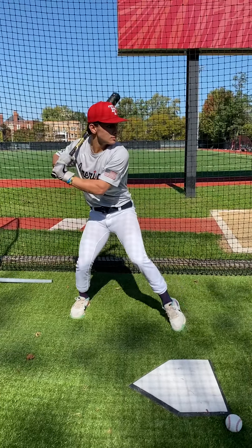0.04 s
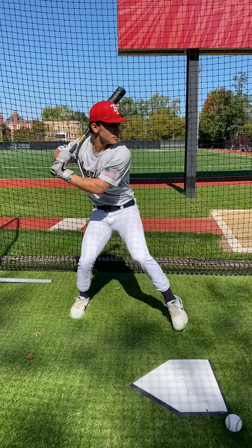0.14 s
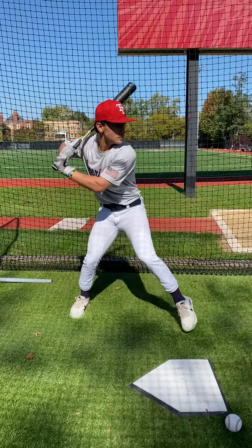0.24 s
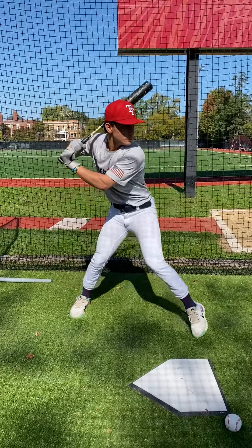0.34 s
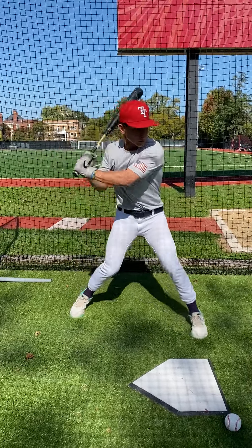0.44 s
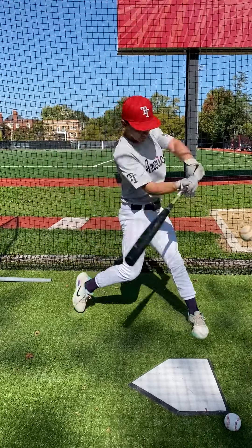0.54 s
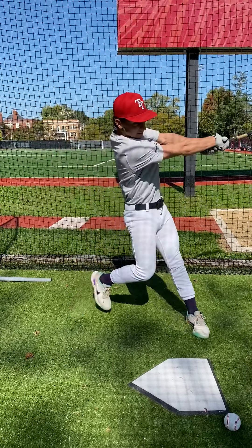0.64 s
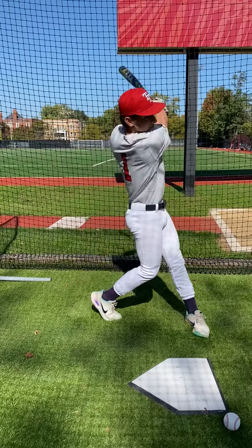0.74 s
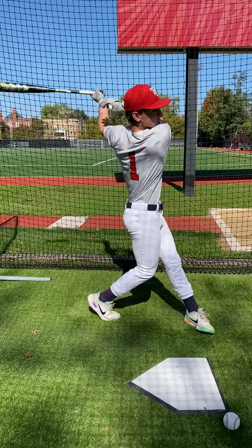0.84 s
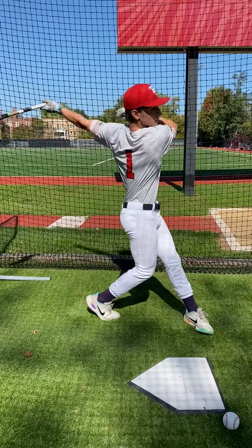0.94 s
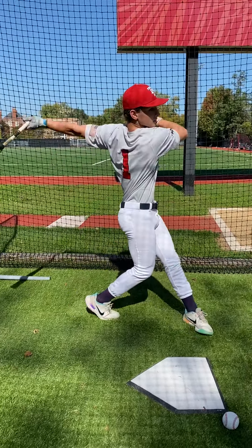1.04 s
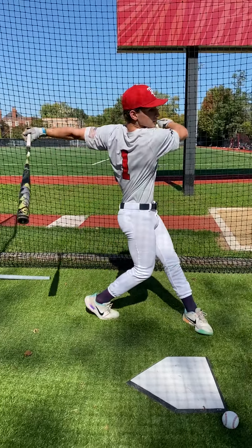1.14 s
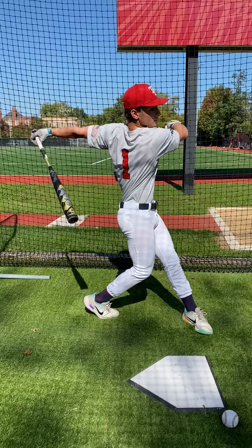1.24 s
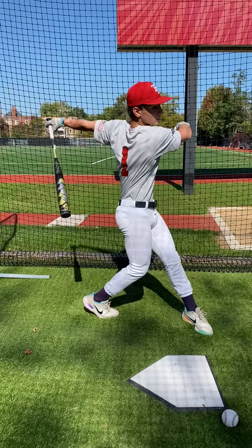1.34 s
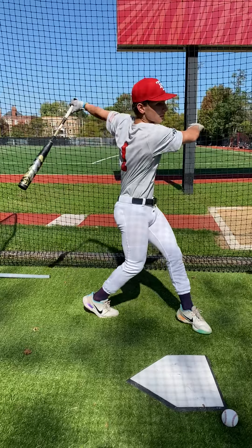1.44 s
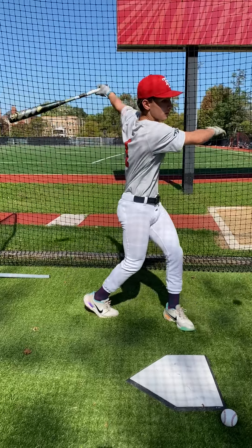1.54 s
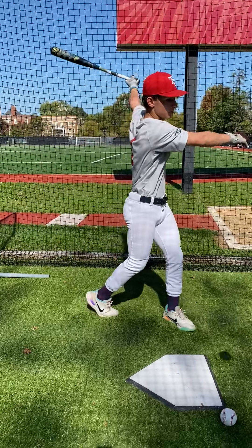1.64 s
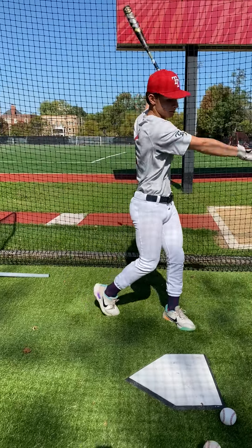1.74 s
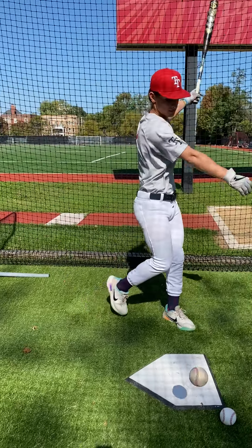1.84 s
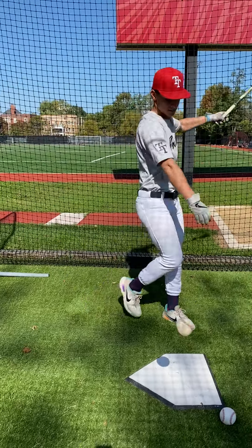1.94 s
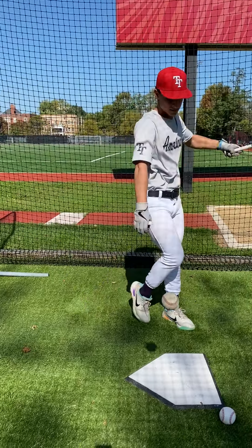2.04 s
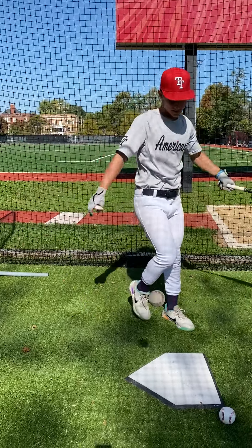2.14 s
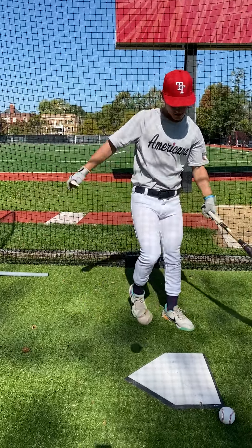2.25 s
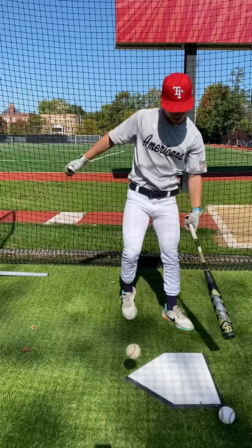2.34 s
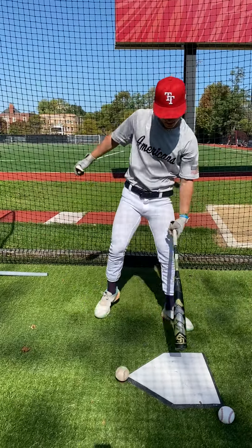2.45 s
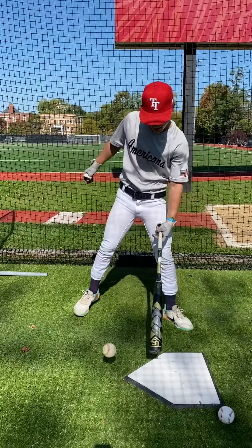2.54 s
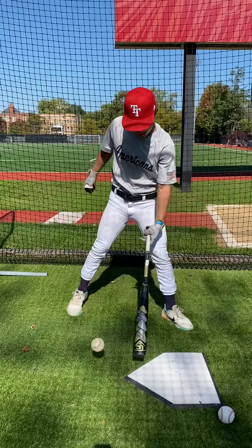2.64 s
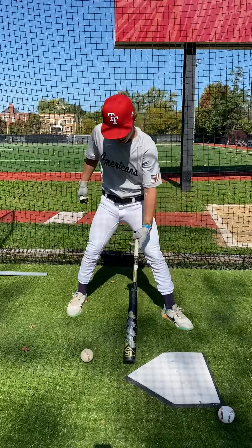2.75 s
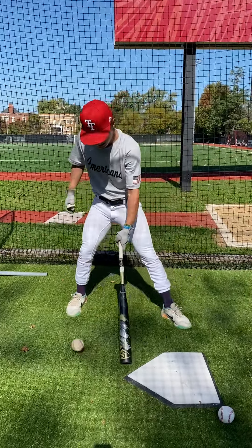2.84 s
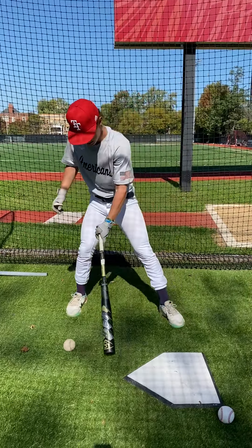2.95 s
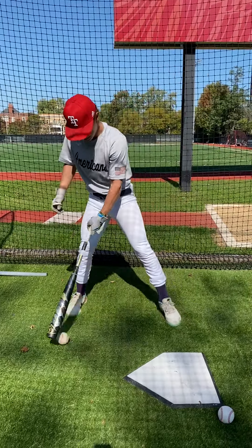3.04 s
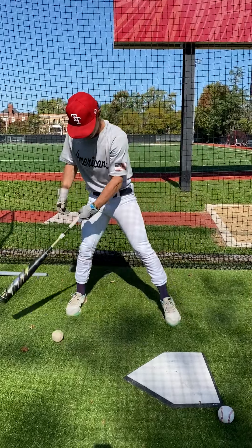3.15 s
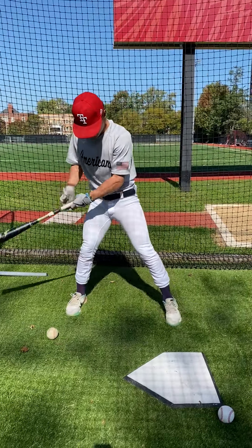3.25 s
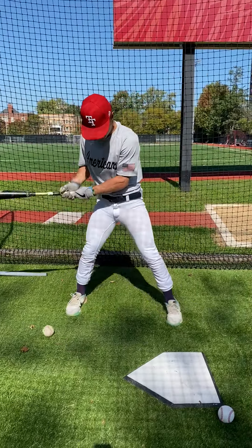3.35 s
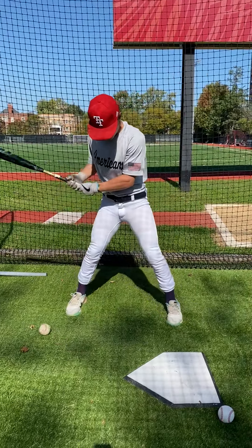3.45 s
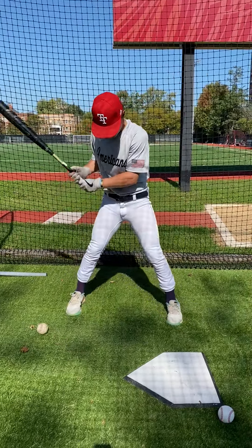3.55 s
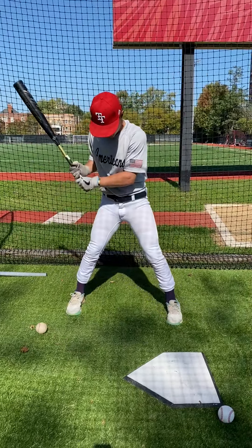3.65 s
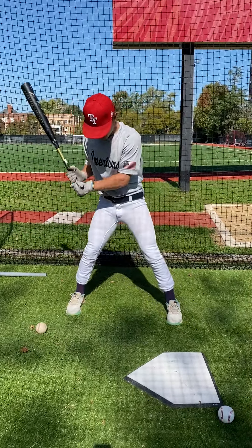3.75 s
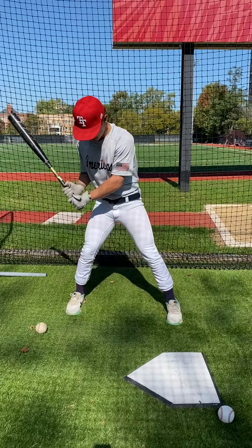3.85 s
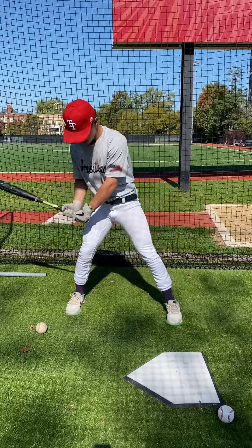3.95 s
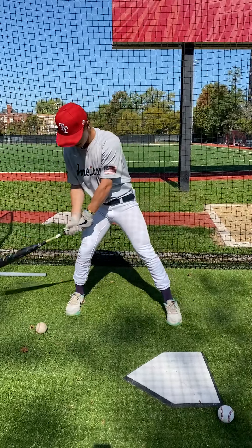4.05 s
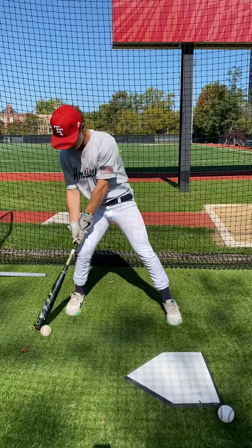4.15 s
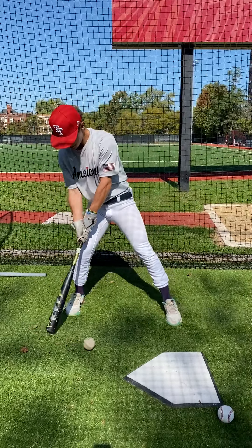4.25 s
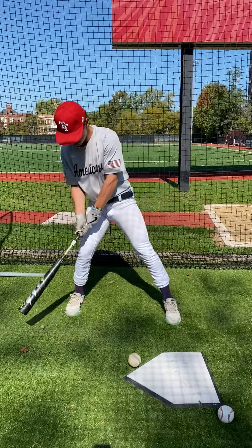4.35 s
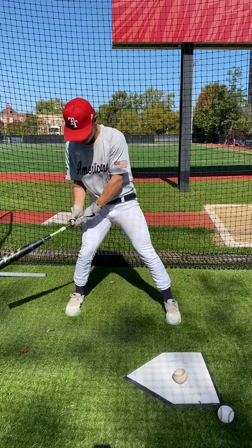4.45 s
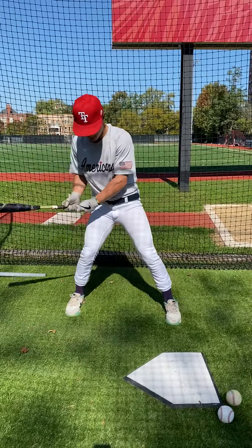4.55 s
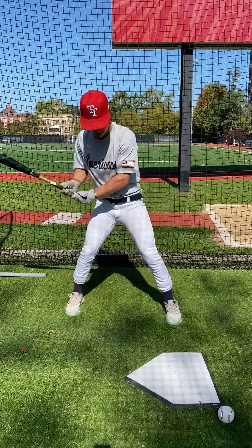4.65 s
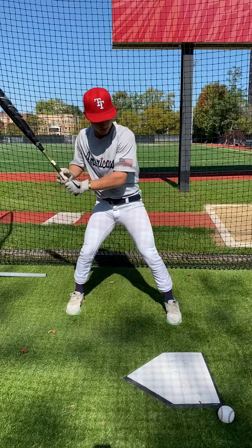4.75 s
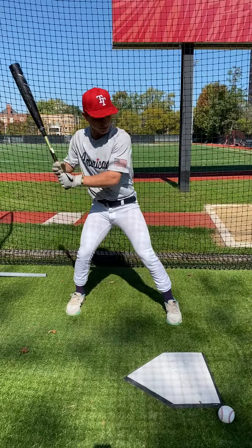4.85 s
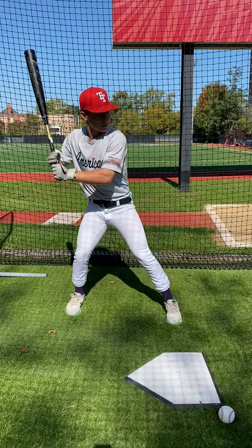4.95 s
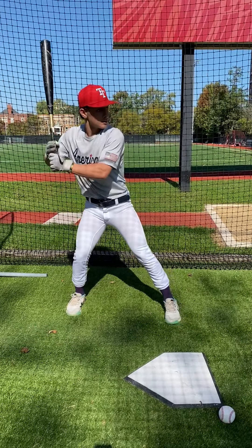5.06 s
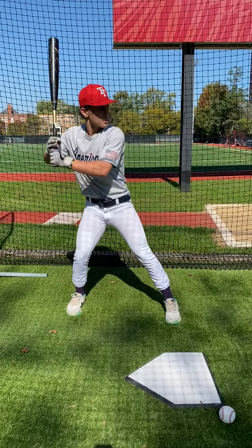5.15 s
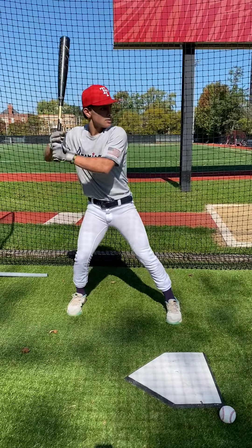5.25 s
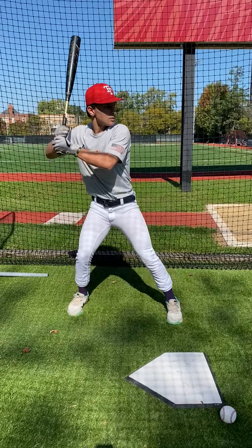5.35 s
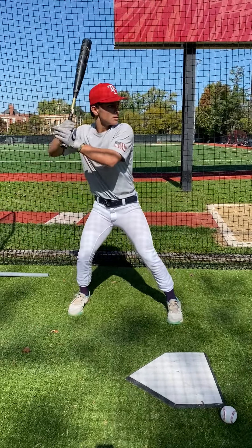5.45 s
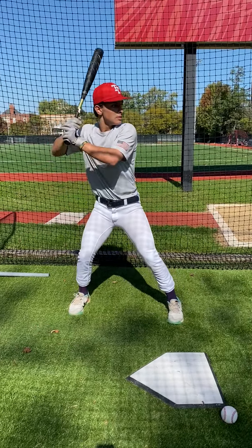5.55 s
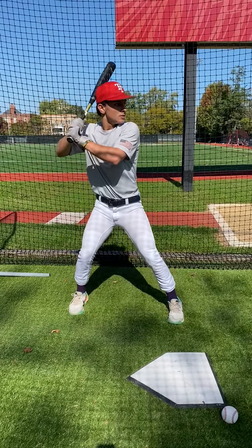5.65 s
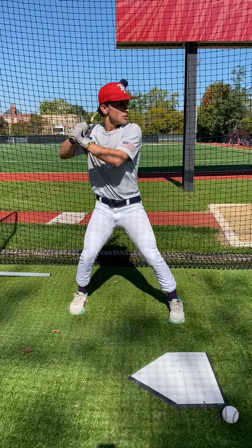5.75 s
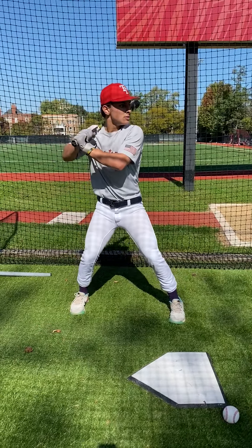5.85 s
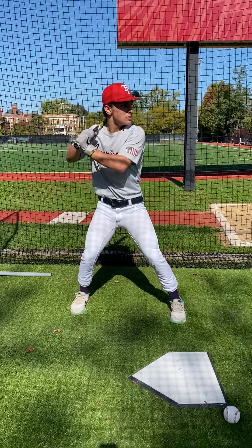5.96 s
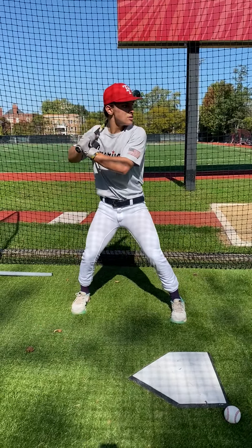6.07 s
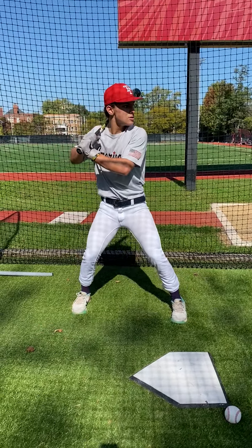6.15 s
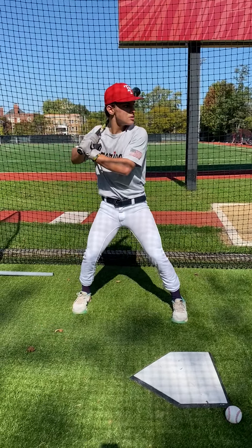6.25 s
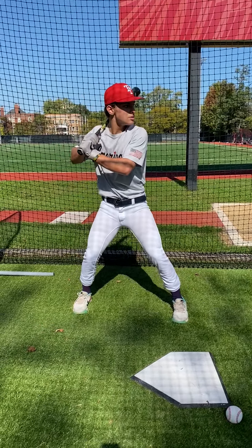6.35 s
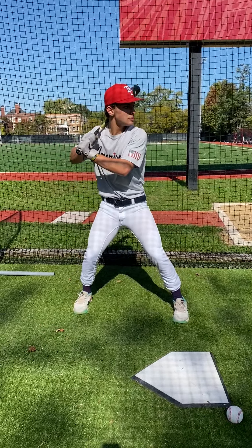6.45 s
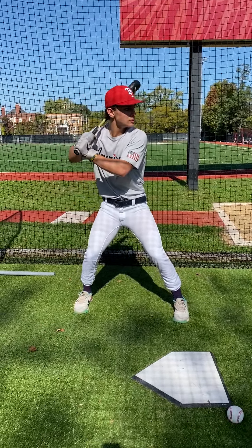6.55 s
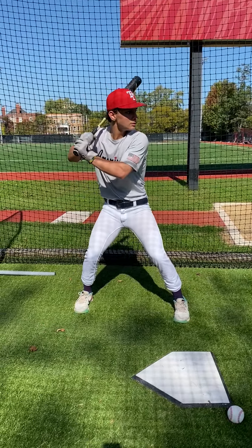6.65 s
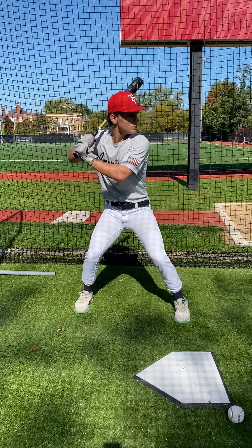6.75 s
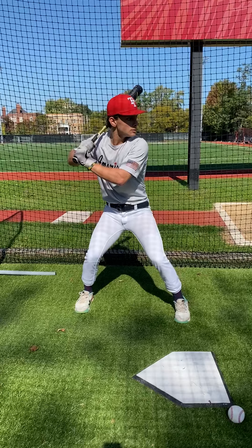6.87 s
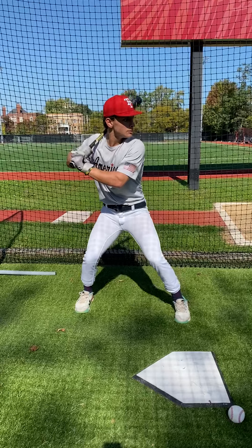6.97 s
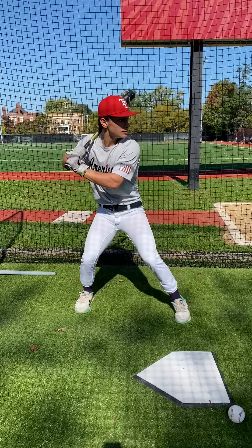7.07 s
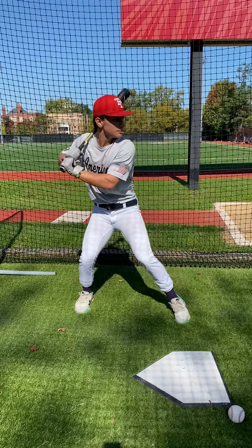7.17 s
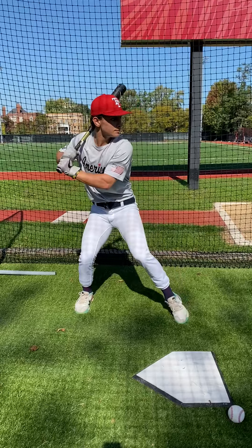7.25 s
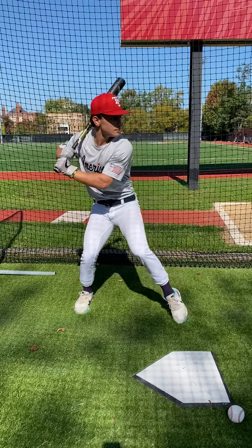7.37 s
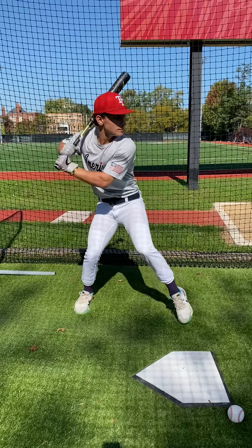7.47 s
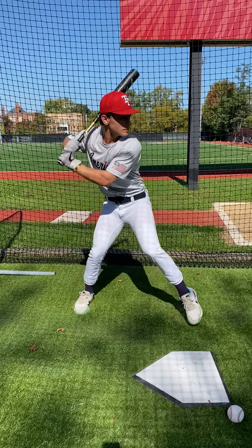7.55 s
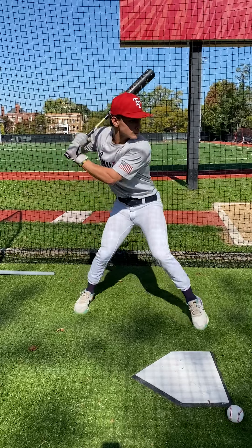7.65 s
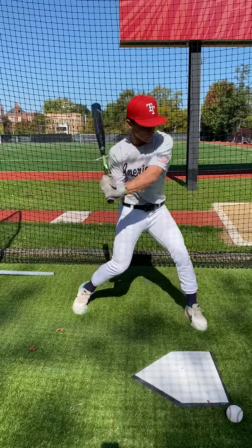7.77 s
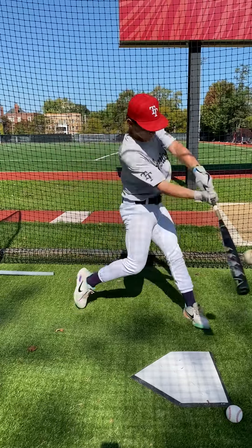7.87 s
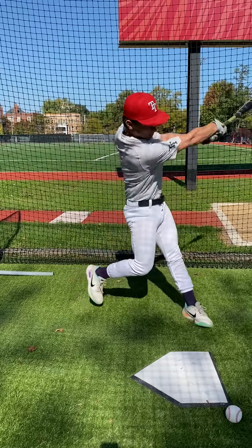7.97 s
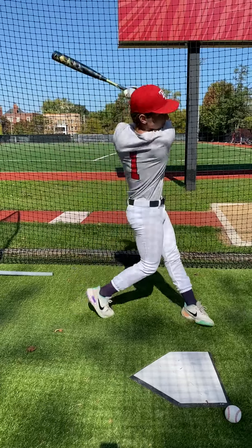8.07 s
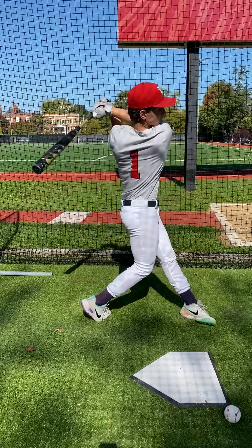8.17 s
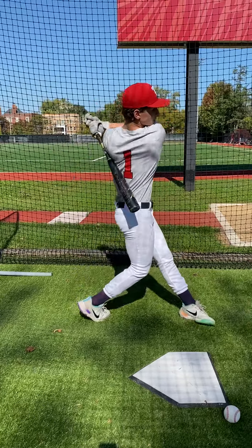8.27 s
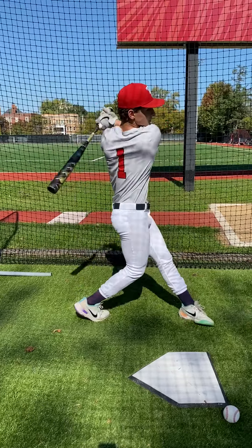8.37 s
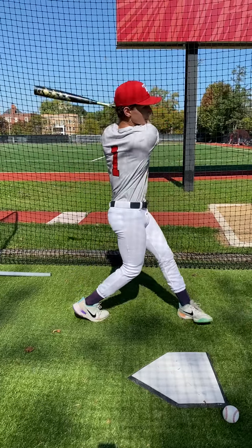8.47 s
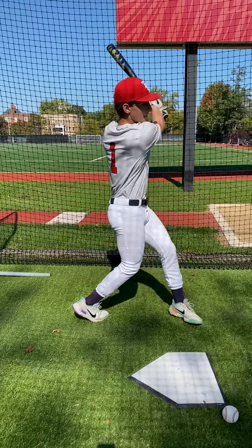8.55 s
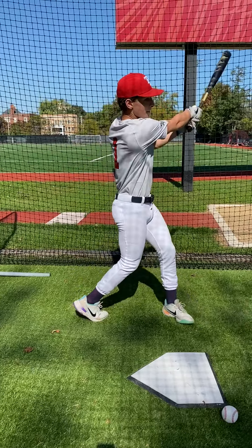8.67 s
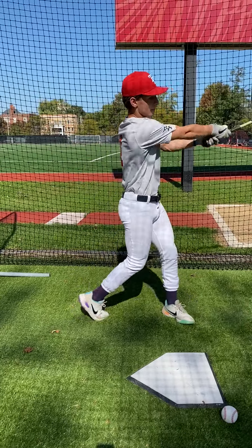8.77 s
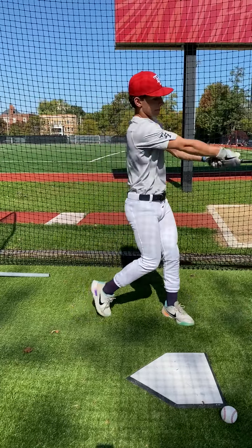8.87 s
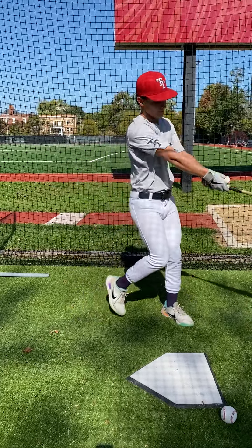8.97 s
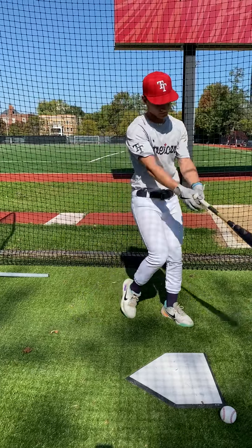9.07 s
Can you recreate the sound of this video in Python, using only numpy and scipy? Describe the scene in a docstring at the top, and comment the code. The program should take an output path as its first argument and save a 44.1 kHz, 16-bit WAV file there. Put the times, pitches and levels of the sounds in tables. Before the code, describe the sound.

Two sharp metallic bat cracks over a low outdoor hum, the first followed by a loud ringing clang, the second by a light net rattle.

```python
"""An outdoor batting cage: two swings over a low hum and distant rumble.
The bat cracks from broadband pulses, noise bursts and the decaying modes of its barrel.
The first ball clangs on the steel frame, the second slaps the net and grazes the frame: clatter and modes.
Thuds on turf are soft pulses; clothes, scuffs and swishes are swells of coloured noise.
Field, stands and near fence answer as scattered noise tails; gain control ducks after each loud blow."""
import sys
import numpy as np
from scipy import signal
from scipy.fft import rfft, irfft, next_fast_len
from scipy.io import wavfile
from scipy.ndimage import uniform_filter1d, minimum_filter1d

SR = 44100
rng = np.random.default_rng(int(sys.argv[2]) if len(sys.argv) > 2 else 0)


def bounce(signal):
    """Save signal as a 16-bit WAV file at the path given by the first command-line argument."""
    frames = np.transpose(np.atleast_2d(signal))
    limited = np.clip(frames, -1, 1)
    pcm = np.round(limited * 32767).astype(np.int16)
    wavfile.write(sys.argv[1], SR, pcm)


N = 401751
TIME = np.arange(N) / SR

# bat on ball: (time [s], crack base level [dB], lead of first contact [s], contact base level [dB],
# barrel ring base level [dB], ball knock level [dB], knock pitch [Hz], air thump level [dB],
# thump pitch [Hz], left-right balance of the knock [dB], lag of the snap [s], snap level [dB],
# zing level [dB], after-ring level [dB])
HITS = [(0.6321, -4, 0.0075, -20.5, -11.5, -7.5, 1050, -9.5, 150, 3, .0005, -19, -10.5, -19.5),
        (7.9364, -2.5, 0.005, -19.5, -4, -6.5, 900, 3, 80, 5.5, .0027, -9.5, -16.5, -20)]


def bat():
    """Air runs ahead and the barrel's zing swells into the crack; first contact sets the barrel ringing; crack,
    snap, knock and thump follow."""
    # spectra of the crack, the first contact and the bright snap: (frequency [Hz], density [dB per Hz])
    crack_colour = [(40, -21), (170, -3), (350, 1), (500, 5), (660, -8), (900, 1), (1400, -4.5),
                    (2100, -15.5), (3100, -3.5), (4500, -7.5), (6500, -15.5), (8700, -26), (12000, -35),
                    (16000, -39.5)]
    contact_colour = [(100, -14.5), (800, 4), (2000, -9), (3200, -0.5), (5200, -3), (7000, -24),
                      (16000, -40.5)]
    snap_colour = [(500, -24.5), (3000, -5.5), (6500, 1.5), (9000, 0.5), (10500, -7), (13000, -0.5),
                   (16000, -2)]
    # modes of the barrel, then of its after-ring: (frequency [Hz], level [dB], t60 [s])
    barrel_modes = [(490, -5.5, .04), (890, 0.5, .04), (1148, -3.5, 0.05), (1640, -6, 0.045),
                    (2300, -13, 0.05), (2880, -5, .04), (3085, -2.5, 0.06), (4000, -6, .03),
                    (4850, -10.5, 0.04)]
    after_modes = [(3420, -0.5, 0.12), (2560, -13, .09)]
    zing_echo_s, zing_echo_db = .076, -24
    after_sharp_hz = -514  # the after-ring starts flat and slides up as the bat swings round

    def crack_push(cycles):
        """One pressure pulse in the colour of the crack."""
        return push(lambda hz: read(crack_colour, hz), cycles)

    out = np.zeros((2, N))
    for (s, crack_db, lead, contact_db, ring_db, knock_db, knock_hz, thump_db, thump_hz,
         pan_db, snap_lag, snap_db, zing_db, after_db) in HITS:
        # air ahead of the bat
        add(out, s - .03, amp(-24.5) * thump(80, octaves=0.9, cycles=1.1))

        # first contact
        contact = s - lead
        add(out, contact, amp(contact_db) * burst(contact_colour, t60=0.16, apart=0.33))
        contact_push = push(lambda hz: read(contact_colour, hz), cycles=1.3)
        add(out, contact, amp(contact_db - 3.5) * contact_push)
        early_ring = eased(ring(barrel_modes, apart=0.26, waver_hz=70), rise_s=0.013)
        add(out, contact, amp(ring_db + 2.0) * early_ring)

        # zing, peaking at the crack
        swell = amp(zing_db) * zing()
        add(out, s - .03, swell)
        add(out, s - .03 + zing_echo_s, amp(zing_echo_db) * swell)  # off the near fence

        # barrel after the crack
        after_ring = ring(after_modes, apart=.2, waver_hz=70, sharp_hz=after_sharp_hz)
        add(out, s, amp(after_db) * after_ring)
        add(out, s, amp(ring_db + 0.5) * ring(barrel_modes, apart=0.22, waver_hz=65))

        # crack and its brightest edge
        add(out, s, amp(crack_db - 5) * crack_push(cycles=2.1))
        add(out, s + snap_lag, amp(snap_db) * push(lambda hz: read(snap_colour, hz), cycles=.6))
        add(out, s + 0.0041, amp(crack_db - 8.0) * crack_push(cycles=1.2), pan_db)  # off the ground
        add(out, s, amp(crack_db - 4.5) * burst(crack_colour, t60=0.05, apart=0.35))

        # knock of the ball and thump of air
        add(out, s + 0.0012, amp(knock_db) * thump(knock_hz, octaves=0.67, cycles=1.8), pan_db)
        add(out, s + 0.0028, amp(thump_db) * thump(thump_hz, octaves=1.24, cycles=.65))
    return out


def zing():
    """A narrow band of barrel vibration that swells to a point 30 ms in, then dies within milliseconds."""
    # spectrum: (frequency [Hz], density [dB per Hz])
    zing_colour = [(1500, -59.5), (2700, -23.5), (3000, -7), (3400, 0.5), (3600, -3), (3950, -20.5),
                   (7000, -60.5)]
    rise_s, fall_s = 0.0042, 0.0034
    t = TIME[:SR // 12] - .03
    envelope = np.exp(np.minimum(t / rise_s, -t / fall_s))
    return blow(noise(zing_colour, len(t), apart=0.27) * envelope)


def cage():
    """The ball brushes into the net; the fittings clatter, the steel frame rings and the net rattles."""
    # ball into the cage: (time [s], clatter level [dB], clatter t60 [s],
    # brightness [dB per octave], frame ring level [dB], left-right balance [dB])
    cage_hits = [(0.7573, -4, 0.07, 0, -4.5, -2.5), (0.7654, -5.5, 0.115, 1.4, -12, 0),
                 (8.0637, -18, 0.14, -0.5, -29, -1), (8.089, -23.5, 0.15, -1.5, -26.5, -1),
                 (8.105, -29.5, 0.5, 1.5, -46, 0)]
    # the frame sings on after the ball has left, sharp at first when struck hard:
    # (time [s], level [dB], starts sharp by [Hz], level of damped start [dB], level of buzz [dB])
    singing = [(.765, -29, 170, -8.5, -25), (8.075, -32, 60, -32, -33)]
    # the shaken net: (time [s], level [dB], t60 [s])
    rattles = [(.78, -32, 0.99), (8.08, -32, 1.1)]
    # modes of the steel frame: (frequency [Hz], level [dB], t60 [s])
    frame_modes = [(490, -9, .05), (1070, -2, .05), (1380, -6, .05), (1900, -7, .05), (2700, 4, 0.03),
                   (2880, 1, 0.025), (3350, -7, 0.04), (4230, -1, .05), (4800, -10, .03), (5470, -8, 0.04),
                   (6660, -14, .05), (11400, -14, 0.1), (12400, -18, 0.1)]
    # its longest-lived modes, close enough to beat: (frequency [Hz], level [dB], t60 [s])
    long_modes = [(4014, 0, 1.45), (4033, -13, .8), (4110, -16, .6)]
    # the same note dying fast while the ball presses on the net: (frequency [Hz], level [dB], t60 [s])
    damped_modes = [(4030, 0, .3), (4105, -9, .2)]
    # spectra of clattering fittings and of their buzz round that note: (frequency [Hz], density [dB per Hz])
    clatter_colour = [(60, -24), (350, -2.5), (750, -3), (1150, 0.5), (2000, 0.5), (2750, -3), (3400, -2.5),
                      (4700, 2), (6500, -5), (8200, -12), (10000, -38.5), (11800, -8), (16000, -23)]
    buzz_colour = [(3000, -40), (3850, -20), (4020, -1), (4200, -0.5), (4450, -8), (5200, -39.5)]
    shimmer_db, shimmer_hz = 2.2, 40

    out = np.zeros((2, N))
    for s, db, t60, tilt_db, ring_db, pan_db in cage_hits:
        brush = eased(burst(clatter_colour, t60, apart=0.41), rise_s=0.0046)
        add(out, s - .01, amp(db - 8.5) * brush, pan_db)
        clatter = burst(clatter_colour, t60, apart=0.58, tilt_db=tilt_db)
        add(out, s, amp(db) * clatter * grains(clatter.shape[1], depth_db=2.0), pan_db)
        add(out, s, amp(ring_db) * ring(frame_modes, apart=0.63, waver_hz=35), pan_db)

    for s, db, sharp_hz, damped_db, buzz_db in singing:
        add(out, s, amp(buzz_db) * burst(buzz_colour, t60=.45, apart=.3))
        damped = ring(damped_modes, apart=0.12, waver_hz=23, sharp_hz=sharp_hz)
        add(out, s, amp(damped_db) * eased(damped, rise_s=0.0018))
        song = eased(ring(long_modes, apart=.15, waver_hz=10, sharp_hz=sharp_hz), rise_s=0.012)
        shimmer = shimmer_db * wander(shimmer_hz)[:song.shape[1]]
        add(out, s, amp(db + shimmer) * song)

    for s, db, t60 in rattles:
        add(out, s, amp(db) * rattle(t60))
    return out


def rattle(t60):
    """Sparse clicks of random size from several fittings, each with its own click of one shared colour, dying
    away."""
    # spectrum of a click: (frequency [Hz], density [dB per Hz])
    rattle_colour = [(300, -24), (1100, 4), (1900, 0.5), (3300, 0), (5000, -6.5), (8000, -27.5),
                     (16000, -36)]
    fittings, clicks_per_s = 6, 130  # the rate is for all fittings together
    out = 0
    for _ in range(fittings):
        struck = rng.random(SR) < clicks_per_s / fittings / SR
        clicks = struck * rng.uniform(.3, 1, SR)
        clicks = clicks * np.exp(-np.log(1000) * TIME[:SR] / t60)
        click = burst(rattle_colour, t60=0.021, apart=0.17)
        out = out + signal.fftconvolve(clicks[None], click, axes=1)
    return blow(out)


def small_knocks():
    """Hollow taps of the bat, dull thuds with a crunch of turf, and light ticks."""
    # the bat's end taps the ball along the turf: (time [s], base level [dB], left-right balance [dB])
    taps = [(4.2176, -29.5, 3)]
    # ball or foot on turf: (time [s], level [dB], pitch [Hz], width [octaves],
    # turf crunch base level [dB], left-right balance [dB])
    thuds = [(1.8068, -12, 163, 0.48, -43.5, 1.5), (1.8063, -21.5, 470, 0.65, -35.5, 3.5),
             (2.4955, -32.5, 280, 0.5, -54, 1), (8.6945, -25.5, 203, 0.6, -49, -1)]
    # grit, net and gear, and short echoes of the second crack near 7.99 and 8.003 s: (time [s], level [dB], t60
    # [s], centre [Hz])
    ticks = [(0.119, -48.5, 0.011, 6100), (1.256, -61.5, 0.014, 8900), (1.826, -46.5, 0.11, 6500),
             (1.8787, -46.5, 0.098, 6300), (1.879, -48, 0.034, 12200), (2.486, -53, 0.047, 4140),
             (2.829, -60, .057, 5120), (3.9414, -55.5, 0.017, 4930), (4.543, -63.5, 0.021, 5000),
             (5.9053, -54, 0.06, 1500), (5.9082, -53.5, 0.04, 5700), (5.909, -57, 0.039, 13100),
             (7.02, -65, 0.049, 12800), (7.4115, -48, 0.02, 5500), (7.886, -43, .03, 1700),
             (7.943, -9, 0.017, 1650), (7.963, -22.5, .02, 1520), (7.9893, -31, 0.018, 1800),
             (7.9897, -42, .015, 7000), (8.003, -32, 0.02, 1800), (8.008, -26.5, 0.14, 3950),
             (8.2317, -53.5, .03, 4040), (8.3335, -44.5, 0.025, 6000), (8.334, -46, .025, 1370)]
    # spectra of a tap and of crunching turf: (frequency [Hz], density [dB per Hz])
    tap_colour = [(60, -16), (220, 3.5), (550, 6), (900, -0.5), (1300, -5), (1800, -1.5), (2300, -24.5),
                  (3400, -30.5), (4400, -16.5), (5300, -13), (6300, -25.5), (16000, -38)]
    crunch_colour = [(200, 11.5), (1500, -5), (3000, -4), (4500, -3), (7000, -15), (16000, -28)]
    # modes of a tap: (frequency [Hz], level [dB], t60 [s])
    tap_modes = [(1206, 0, 0.043), (1716, -2, 0.04), (4330, -12, 0.044), (5200, -16, 0.056)]
    # colour of a tick: (multiple of its centre frequency [ratio], density [dB])
    tick_shape = [(0.201, -11), (.7, -5), (1, 2), (1.35, -17), (2.502, -25), (8, -38)]
    tap_ring_db, tap_rattle_db = -11.5, -17  # relative to the tap

    out = np.zeros((2, N))
    for s, db, pan_db in taps:
        add(out, s, amp(db) * push(lambda hz: read(tap_colour, hz), cycles=1.7), pan_db)
        add(out, s + 0.00095, amp(db + tap_ring_db) * ring(tap_modes, apart=.3, waver_hz=90), pan_db)
        turf = burst(crunch_colour, t60=0.12, apart=0.34, tilt_db=2.5)
        add(out, s, amp(db + tap_rattle_db) * turf)

    for s, db, hz, octaves, crunch_db, pan_db in thuds:
        add(out, s, amp(db) * thump(hz, octaves, cycles=1.4), pan_db)
        add(out, s, amp(crunch_db) * burst(crunch_colour, t60=0.0092, apart=0.55))
        add(out, s, amp(crunch_db - 5.5) * burst(crunch_colour, t60=0.1, apart=0.37))  # crumbs settle

    for s, db, t60, hz in ticks:
        tick_colour = [(hz * ratio, level) for ratio, level in tick_shape]
        add(out, s, amp(db) * burst(tick_colour, t60, apart=0.13))
    return out


def batter():
    """Grainy rustle of cloth and turf, the swish of the bat, and short rising squeaks."""
    # clothes as the batter reaches for the ball and straightens up: (centre [s], spread [s], level [dB])
    rustles = [(1.59, 0.071, -69.5), (2.93, 0.036, -68.5), (3.035, .02, -65.5), (4.375, 0.016, -56),
               (4.66, 0.019, -60.5), (4.82, 0.029, -63), (4.94, 0.018, -65), (5.15, 0.15, -72.5),
               (8.66, 0.16, -63)]
    # cleats twisting in the turf after the second swing: (centre [s], spread [s], level [dB])
    scuffs = [(8.2, 0.017, -47), (8.35, 0.11, -55), (8.72, 0.14, -55.5), (8.98, 0.041, -67)]
    # shoes and gloves: (start [s], length [s], from [Hz], to [Hz], level [dB])
    squeaks = [(0.526, .036, 4100, 4630, -37.5), (8.954, 0.068, 2950, 3090, -55.5)]
    # spectra of cloth, scuffed turf and bat swish: (frequency [Hz], density [dB per Hz])
    cloth_colour = [(200, -2), (1500, -11), (4500, 1.5), (7000, 4.5), (9500, -18.5), (13000, -3),
                    (16000, -8.5)]
    scuff_colour = [(300, -22), (1100, 2), (2000, -1.5), (3000, -10.5), (4500, -11), (9000, -40.5)]
    swish_colour = [(50, 3), (250, 2), (600, 3.5), (1500, -5.5), (3000, -14), (6000, -18), (16000, -50.5)]
    # every swing is the same movement: (time before the crack [s], spread [s], level [dB])
    stride_cloth, turn_cloth = (.16, 0.04, -60), (0.046, 0.03, -54)
    foot_plant = (0.11, 0.01716, -49.5)
    bat_speeds_up, bat_passes = (0.05, 0.026, -43.5), (0.008, 0.015, -38.5)

    # faint random rustle between the swings
    between = (TIME > 0.97) & (TIME < 6.3)
    fidget_db, fidget_spread_db, fidget_hz = -80.5, 10, 9.1
    fidget = between * amp(fidget_db + fidget_spread_db * np.tanh(wander(fidget_hz)))

    cloth = in_each_swing(stride_cloth, turn_cloth) + swells(rustles) + fidget
    out = cloth * grains(N, depth_db=3) * noise(cloth_colour, N, apart=0.1)
    feet = in_each_swing(foot_plant) + swells(scuffs)
    out += feet * grains(N, depth_db=4.5) * noise(scuff_colour, N, apart=0.2)
    out += in_each_swing(bat_speeds_up, bat_passes) * noise(swish_colour, N, apart=0.59)
    for s, length, from_hz, to_hz, db in squeaks:
        add(out, s, amp(db) * glide(length, from_hz, to_hz, waver_hz=130, size=30))
    return out


def in_each_swing(*moves):
    """The swells of these movements, placed before every crack of the bat."""
    return swells([(hit[0] - before, spread, db) for hit in HITS for before, spread, db in moves])


def fence(x):
    """A scattered mid-range slap from the near fence, centred 72 ms late."""
    t = TIME[:SR // 5]
    slap_colour = [(300, -29), (1500, 0), (3000, 2.0), (4200, 1), (6000, -4.0), (12000, -13.0)]
    scatter = noise(slap_colour, len(t), apart=0.86)
    scatter *= np.exp(-((t - .072) / .022) ** 2)
    return signal.fftconvolve(x, scatter / np.linalg.norm(scatter[0]), axes=1)[:, :N]


def field(x, echo_db):
    """Outdoor tail in uneven clumps of reflections, with a smeared echo from the stands."""
    # how long the field rings: (frequency [Hz], t60 [s])
    field_t60 = [(100, .5), (500, 0.18), (1500, 1.4), (4000, 1.64), (7000, 0.95), (14000, 0.32)]
    patchy_db = 2.8
    hz, t, z = signal.stft(rng.standard_normal((2, 2 * SR)), SR, nperseg=256)
    decay = np.exp(-np.log(1000) * t / read(field_t60, hz)[:, None])
    stands = 1 + amp(echo_db) * np.exp(-((t - .255) / .05) ** 2)
    onset = 1 - np.exp(-t / 0.0075)
    clumps = uniform_filter1d(rng.standard_normal(z.shape[1:]), size=9, axis=0)
    clumps = evened(uniform_filter1d(clumps, size=5, axis=1))
    z = z * decay * stands * onset * amp(patchy_db * clumps)
    tail = signal.istft(z, SR, nperseg=256)[1]
    return signal.fftconvolve(x, tail / np.linalg.norm(tail[0]), axes=1)[:, :N]


def background():
    """Unsteady rumble and wash of the town, a few gusts, a wavering machine hum, a trill and far tones."""
    # level of the distant town, counted from town_loud_db: (time [s], level [dB])
    town = [(0.0, -55), (0.284, -56), (0.4, -56), (1.95, -61), (3.68, -61.5), (5.66, -60), (6.06, -56.5),
            (7.57, -56.5), (7.7, -55.5), (8.9, -57.5), (9.1, -56)]
    # the rumble dips for a while after the loud clang: (centre [s], spread [s], depth [dB])
    rumble_dips = [(.89, .06, 5), (1.15, .22, 3.5)]
    # low gusts of wind: (centre [s], spread [s], level [dB])
    gusts = [(3.85, 0.092, -41), (6.36, 0.052, -33.5), (6.7, 0.17, -43), (7.25, 0.049, -30.5),
             (7.67, 0.043, -34.5), (8.03, 0.07, -33.5), (8.27, 0.21, -37)]
    # a faint thin trill far off, as of an insect: (centre [s], spread [s], level [dB])
    trills = [(2.6, 0.2, -77), (4.4, 0.34, -77), (6.4, 0.55, -74)]
    # faint short whistling tones far off: (start [s], length [s], from [Hz], to [Hz], level [dB])
    far_tones = [(8.589, 0.14, 1080, 1126, -50), (8.7, .13, 2160, 2030, -56)]
    # spectra of rumble, wash and wind: (frequency [Hz], density [dB per Hz])
    rumble_colour = [(15, -27), (32, -21.5), (50, 0.5), (85, -3), (125, 0.5), (180, -5), (230, -7.5),
                     (310, -7), (450, -20), (800, -46), (2000, -67)]
    air_colour = [(100, -13.5), (450, 10), (900, 2), (1500, -2.5), (2500, -10), (4200, -14), (5600, -21.5),
                  (6700, -24), (7600, -33.5), (9000, -63), (13000, -41), (16000, -41.5)]
    gust_colour = [(15, -14), (50, 0.5), (110, 0.5), (220, -12), (500, -36), (2000, -75.5)]
    town_loud_db, rumble_db, wash_db = -56, -37.5, -49.5  # rumble and wash when the town is loud
    rumble_follows = .9  # share of the town's changes that the rumble takes
    flutter_db, flutter_hz = 0.88, 11  # unsteadiness of the rumble and its fastest rate

    town_db = np.interp(TIME, *np.transpose(town)) - town_loud_db
    dip_db = sum(db * np.exp(-.5 * ((TIME - s) / spread) ** 2) for s, spread, db in rumble_dips)
    level_db = rumble_db + rumble_follows * town_db - dip_db + flutter_db * wander(flutter_hz)
    rumble = amp(level_db) * noise(rumble_colour, N, apart=0.054)
    air = amp(wash_db + town_db) * noise(air_colour, N, apart=1.0)
    wind = swells(gusts) * noise(gust_colour, N, apart=0.056)
    hum = amp(-43.8) * narrow(hz=155, width_hz=7)
    trill = swells(trills) * narrow(hz=6690, width_hz=55)
    tones = np.zeros((2, N))
    for s, length, from_hz, to_hz, db in far_tones:
        add(tones, s, amp(db) * glide(length, from_hz, to_hz, waver_hz=60, size=120))
    return (rumble + air + wind + hum + trill + tones) * amp([[.4], [-.4]])  # leans 0.8 dB left


def amp(db):
    """Decibels to gain."""
    return 10 ** (np.asarray(db) / 20)


def read(points, hz):
    """A table read on a log-frequency axis."""
    f, value = np.transpose(points)
    return np.interp(np.log(hz + 1), np.log(f), value)


def bins(x):
    """The frequencies in the spectrum of x."""
    return np.fft.rfftfreq(x.shape[-1], 1 / SR)


def evened(x):
    """Scaled to rms 1."""
    return x / np.sqrt(np.mean(x ** 2))


def blow(x):
    """Scaled to the energy of 10 ms at rms 1."""
    return x / np.sqrt(np.mean(np.sum(x ** 2, -1)) / (SR / 100))


def add(mix, s, sound, pan_db=0):
    """Puts a sound into the stereo mix; positive pan_db leans left."""
    part = mix[:, round(s * SR):][:, :sound.shape[-1]]
    part += amp([[pan_db / 2], [-pan_db / 2]]) * sound[..., :part.shape[1]]


def noise(spectrum, size, apart, tilt_db=0):
    """Coloured stereo noise; apart is the size of what the channels do not share."""
    mid, side = rng.standard_normal((2, next_fast_len(size, True)))
    x = np.array([mid + apart * side, mid - apart * side])
    colour_db = read(spectrum, bins(x)) + tilt_db * np.log2(bins(x) / 3000 + .1)
    return evened(irfft(rfft(x) * amp(colour_db), len(mid))[:, :size])


def burst(spectrum, t60, apart, tilt_db=0):
    """A dense cluster of short-lived vibrations: decaying coloured noise."""
    t = TIME[:int((t60 + .03) * SR)]
    return blow(noise(spectrum, len(t), apart, tilt_db) * np.exp(-np.log(1000) * t / t60))


def push(colour_db, cycles):
    """One pressure pulse; each frequency lags by some of its own cycles: treble first, bass last."""
    hz = bins(TIME[:SR])
    lag = np.exp(-2j * np.pi * cycles * np.log(hz + 1))
    pulse = irfft(amp(colour_db(hz)) * lag, SR)
    return blow(pulse[:SR // 8])


def thump(pitch_hz, octaves, cycles):
    """A soft push with its energy round one pitch, about 8 dB down at the given octaves away."""
    def hump_db(hz):
        away = np.log2((hz + 1) / pitch_hz) / octaves
        return -80 * np.log10(1 + (away / 2) ** 2)
    return push(hump_db, cycles)


def ring(modes, apart, waver_hz, sharp_hz=0):
    """Decaying modes that waver in pitch and may start sharp, each at its own phase in each channel."""
    settle_s = .04
    out = np.zeros((2, 2 * SR))
    for hz, db, t60 in modes:
        t = TIME[:int(min(1.2 * t60, 2) * SR)]
        smooth = uniform_filter1d(rng.standard_normal(len(t) + SR // 8), size=300)
        drift = waver_hz * evened(smooth)[:len(t)]
        shift = apart * (2 * rng.random() - 1) * np.array([[1], [-1]])
        pitch = hz + drift + sharp_hz * np.exp(-t / settle_s)
        turns = np.cumsum(pitch) / SR + rng.random()
        decay = np.exp(-np.log(1000) * t / t60)
        add(out, 0, amp(db) * decay * np.sin(2 * np.pi * turns + shift))
    return blow(out)


def eased(x, rise_s):
    """Softens the start of a sound."""
    return x * (1 - np.exp(-TIME[:x.shape[-1]] / rise_s))


def swells(rows):
    """Bell-shaped swells of level."""
    return sum(amp(db) * np.exp(-.5 * ((TIME - s) / spread) ** 2) for s, spread, db in rows)


def grains(size, depth_db):
    """Uneven level of many tiny contacts a few milliseconds long."""
    chance = evened(uniform_filter1d(rng.standard_normal(size), size=160))
    return evened(amp(depth_db * np.clip(chance, -1.7, 1.7)))


def wander(top_hz):
    """Slow random drift of rms 1, spread over the three octaves below top_hz."""
    t = TIME[::200]
    rates = top_hz * 2 ** (-3 * rng.random(24))
    drift = sum(np.sin(2 * np.pi * (hz * t + rng.random())) for hz in rates)
    return np.interp(TIME, t, evened(drift))


def narrow(hz, width_hz):
    """Noise in one narrow resonance: a wavering tone of rms 1."""
    white = rng.standard_normal(next_fast_len(N, True))
    resonance = 1 / (1 + ((bins(white) - hz) / width_hz) ** 2)
    return evened(irfft(rfft(white) * resonance, len(white))[:N])


def glide(length, from_hz, to_hz, waver_hz, size):
    """A short wavering tone that slides in pitch; size is the length of a waver in samples."""
    count = round(length * SR)
    waver = evened(uniform_filter1d(rng.standard_normal(count), size=size))
    hz = np.linspace(from_hz, to_hz, count) + waver_hz * waver
    return np.hanning(count) * np.sin(2 * np.pi * np.cumsum(hz) / SR)


def port_phase(hz):
    """Phase [rad] between two microphone ports: a small hump at 400 Hz, near opposite in the treble."""
    knee_hz = 3300
    treble = 2.7 * hz ** 3 / (hz ** 3 + knee_hz ** 3)
    hump = .5 * hz * 800 / (hz ** 2 + 400 ** 2)
    return treble + hump


def scene():
    """All sources and their echoes."""
    cracks, clangs, knocks = bat(), cage(), small_knocks()
    echoes = amp(-30.0) * field(cracks, echo_db=-5.0)
    echoes += amp(-31.5) * field(clangs + knocks, echo_db=-3.5)
    echoes += amp(-29.5) * fence(cracks)
    return cracks + clangs + knocks + echoes + batter() + background()


def record(dry):
    """Port phase, gain control that holds and then recovers, soft overload, band limit."""
    turn = np.exp(.5j * port_phase(bins(dry)) * np.array([[1], [-1]]))
    x = irfft(rfft(dry) * turn, N)

    limit_db, recovery_db_per_s = -10.5, 80
    hold = 2 * round(0.051 * SR) + 1  # samples
    power_db = 10 * np.log10(abs(uniform_filter1d((x ** 2).mean(0), size=220)) + 1e-12)
    over_db = np.maximum(power_db - limit_db, 0)
    held_db = -minimum_filter1d(-over_db, hold, origin=hold // 2)
    fall = recovery_db_per_s * TIME
    duck_db = uniform_filter1d(np.maximum.accumulate(held_db + fall) - fall, size=90)

    out = np.tanh(x * amp(-duck_db))
    low_pass = signal.firwin(511, 15900, window=("kaiser", 9), fs=SR)  # edge in Hz
    return signal.oaconvolve(out, low_pass[None], "same")


dry = scene()
out = record(dry)
bounce(out)
```